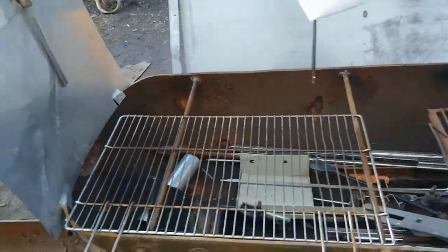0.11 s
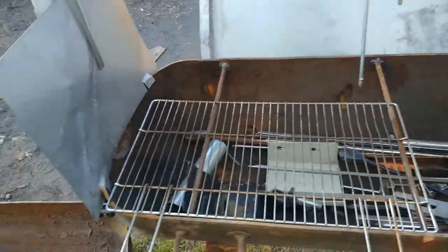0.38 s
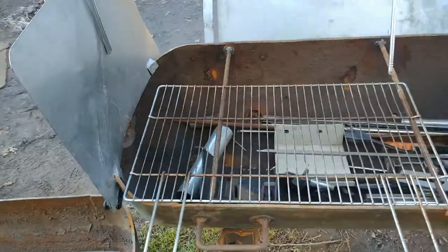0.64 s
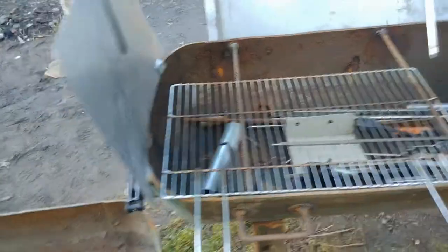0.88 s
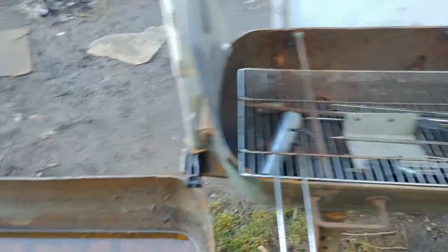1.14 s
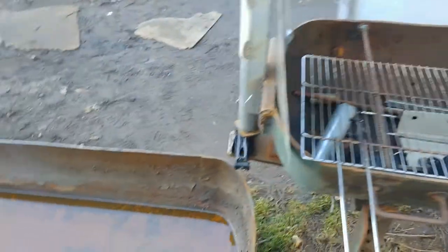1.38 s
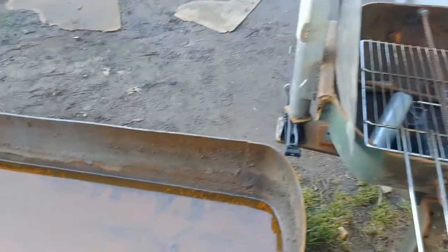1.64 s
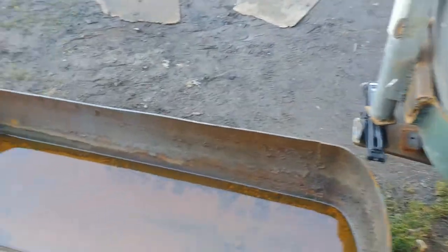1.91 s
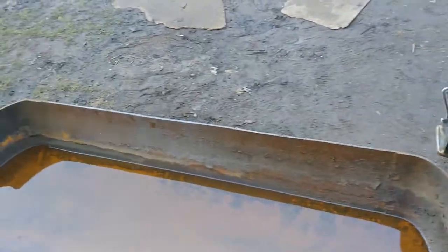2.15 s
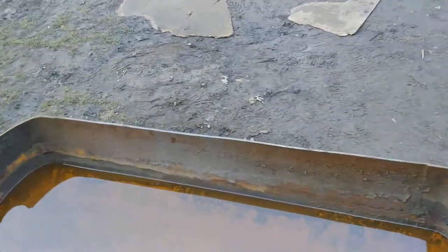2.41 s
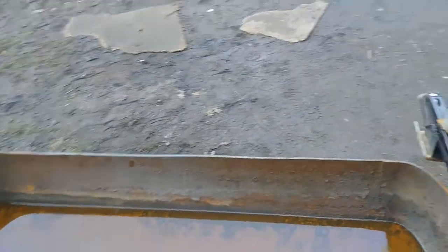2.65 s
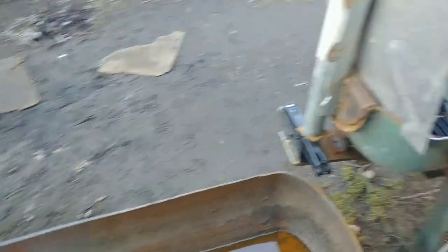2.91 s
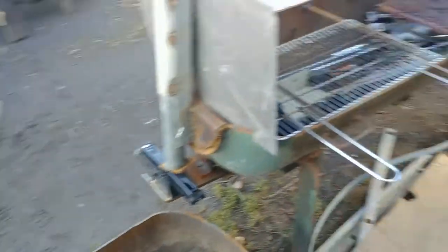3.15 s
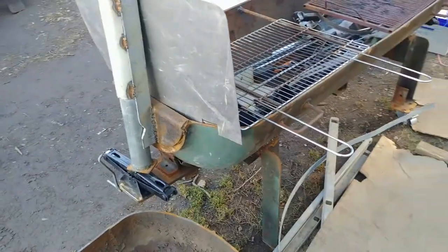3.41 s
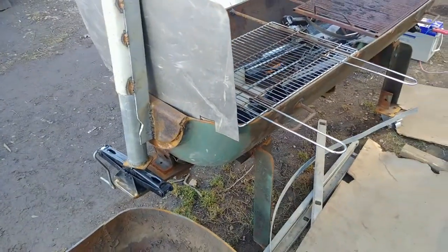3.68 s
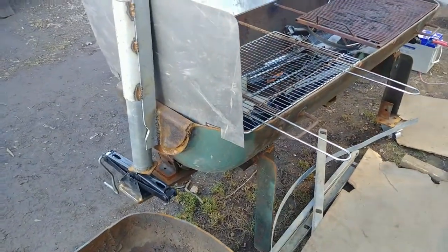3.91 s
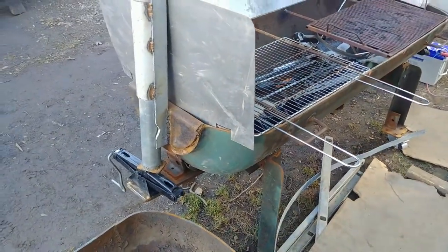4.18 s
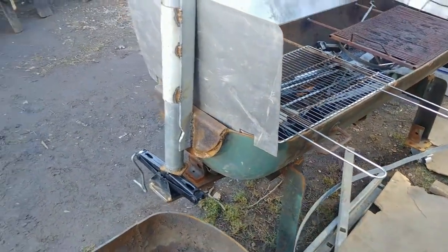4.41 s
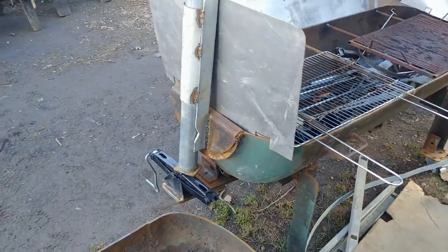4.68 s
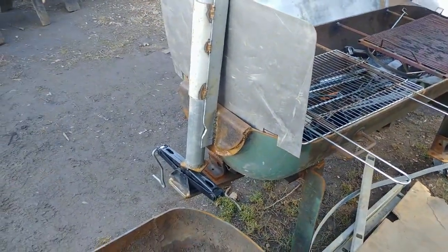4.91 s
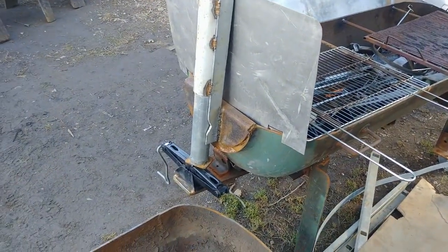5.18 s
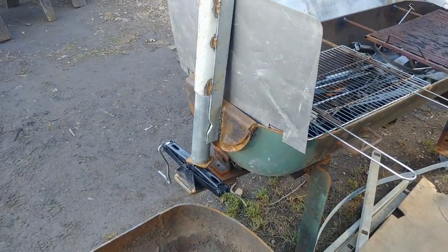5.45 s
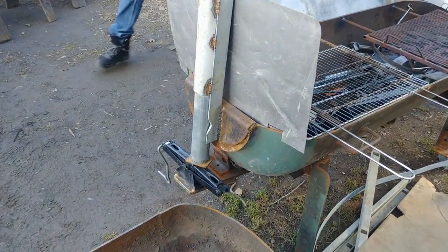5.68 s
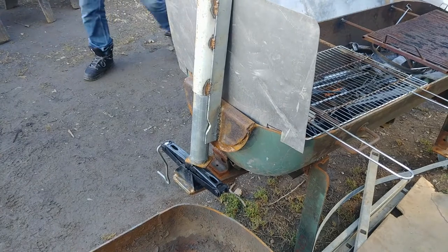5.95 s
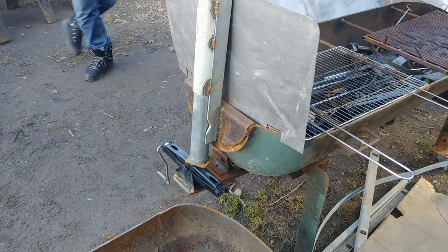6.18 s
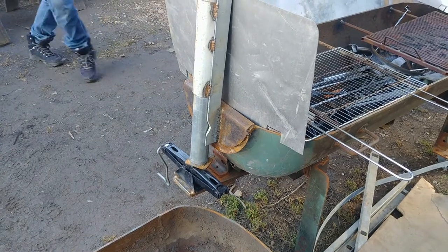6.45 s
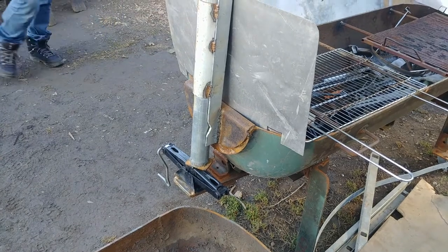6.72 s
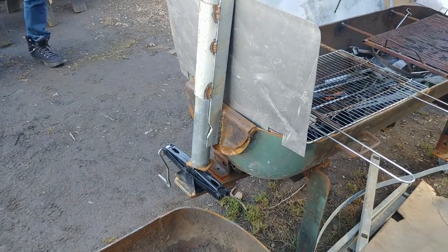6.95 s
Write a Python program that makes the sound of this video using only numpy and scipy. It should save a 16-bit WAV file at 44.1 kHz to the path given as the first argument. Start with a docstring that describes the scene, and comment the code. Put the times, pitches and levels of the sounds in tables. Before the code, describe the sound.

Dull booming knocks on a sheet-steel barbecue trough, with grates clinking and gritty rattles, then a quiet yard with distant traffic and wavering low hum.

```python
"""A yard with a steel barbecue: someone moves round it, phone in hand, then only the yard is left.
The trough booms dully from decaying modes; grates and loose hardware clink as noise cracks over ringing rods.
Random grains make the shudder, the scraping grit and short rasps, the last of them a few far boots.
Behind lie far traffic, a passing car, wavering hum, thin insect-like hiss and two gusts, all mostly shaped noise.
The phone has two microphone ports, each with its own colour."""
import sys
import numpy as np
from scipy import signal
from scipy.fft import rfft, irfft, next_fast_len
from scipy.io import wavfile
from scipy.ndimage import uniform_filter1d

SR = 44100
rng = np.random.default_rng(int(sys.argv[2]) if len(sys.argv) > 2 else 0)


def linear_from_db(decibels):
    """Turn decibels (scalar or array-like) into linear amplitude factors; 0 gives 1."""
    return 10 ** (np.asarray(decibels, float) / 20)


def unload_wav(signal):
    """Save mono or channel-first audio to the path in sys.argv[1] as 16-bit WAV at rate SR, clipped to [-1, 1]."""
    wavfile.write(
        sys.argv[1],
        SR,
        np.round(np.clip(np.atleast_2d(signal).T, -1, 1) * 32767).astype(np.int16),
    )


N = 312228
T = np.arange(N) / SR
M = next_fast_len(N)
F = np.fft.rfftfreq(M, 1 / SR) + 1e-9
LEFT_LAG_S = 0.00016
# all table levels are ahead of the ports and the output gain


def unit(x):
    """Scale to rms 1."""
    return x / np.sqrt(np.mean(x ** 2))


def table(rows):
    """Read a (f/Hz, value) table at every frequency, straight on a log axis."""
    hz, value = np.transpose(rows)
    return np.interp(np.log(F), np.log(hz), value)


def colour(x, gain):
    """Filter by a gain for each frequency."""
    return irfft(rfft(x, M) * gain, M)[..., :N]


def band(x, lo_hz, hi_hz, order=2):
    """Causal band-pass."""
    sos = signal.butter(order, [lo_hz, min(hi_hz, .45 * SR)], "band", fs=SR, output="sos")
    return signal.sosfilt(sos, x)


def hump(hz, width):
    """Gain of one steep resonance."""
    return 1 / (1 + ((F - hz) / (width / 2)) ** 2)


def walk(rate):
    """Random levels held 1 / rate s, slewed twice and halved."""
    k = int(SR / rate)
    held = np.repeat(rng.standard_normal(N // k + 1), k)
    return 0.5 * uniform_filter1d(uniform_filter1d(held, k), k)[:N]


def grains(rate, spread_db):
    """Random tiny impacts, rate per second, some stronger than the rest."""
    hit = rng.random(N) < rate / SR
    return hit * rng.standard_normal(N) * linear_from_db(spread_db * np.minimum(rng.exponential(size=N), 3))


def add(out, s, x):
    """Mix x into out from time s on."""
    i = int(s * SR)
    out[i:i + len(x)] += x[:N - i]


def decay(t, t60):
    """Even decay, down 60 dB after t60 s."""
    return np.exp(-np.log(1000) * t / t60)


def ring(hz, db, t60, length):
    """Sum of decaying modes struck at time zero."""
    t = T[:int(length * SR)]
    return linear_from_db(db) @ (decay(t, t60[:, None]) * np.sin(2 * np.pi * hz[:, None] * t))


def swells(s, fade_s, db, rise_share=1):
    """Bell-shaped swells summed in power; rise_share is rise time over fade time."""
    power = np.zeros(N)
    for at, fade, gain in zip(s, fade_s, linear_from_db(db)):
        reach = fade * np.where(T < at, rise_share, 1)
        power += gain ** 2 * np.exp(-2 * ((T - at) / reach) ** 2)
    return np.sqrt(power)


def shudders(s, db, t60, rise_s=0.0039):
    """A quick rise at each jolt, then an even decay; summed in power."""
    power = np.zeros(N)
    for at, gain, fall in zip(s, linear_from_db(db), t60):
        t = np.maximum(T - at, 0)
        power += (gain * np.minimum(t / rise_s, 1) * decay(t, fall)) ** 2
    return np.sqrt(power)


# dull blows on the trough, the last few faint and far:
# [t/s, level/dB, boom f/Hz, boom t60/s, upper modes and clatter relative level/dB]
BLOWS = [(0.093, -11.5, 216.2, 0.24, -27), (0.394, -21.5, 270, 0.093, -24),
         (0.8225, 6.5, 200, 0.054, -29.5), (1.392, -26.5, 430, 0.13, -11.5), (1.453, -30, 460, 0.089, -6),
         (2.101, -15, 102, 0.11, -15), (2.1453, -14, 334, 0.03, -10), (2.1504, 1.5, 238, 0.037, -23.5),
         (3.1224, -14, 257, 0.079, -19), (3.147, -16, 236, 0.047, -20), (3.165, -9, 279, 0.12, -16),
         (3.222, -7, 375, 0.095, -17), (3.244, -13.5, 200, 0.044, -21), (3.308, -24, 350, 0.061, -10.5),
         (3.393, -21.5, 190.1, 0.1, -24), (4.485, -29, 640, 0.086, -17.5), (5.942, -26, 271, 0.086, -26),
         (6.177, -25, 344, 0.1, -39), (6.208, -29, 180, 0.39, -38)]
# upper modes of the trough: [f/Hz, relative level/dB, t60/s]
TROUGH_MODES = [(553, -0.5, 0.081), (836, -3.5, 0.058), (1111, -15, 0.088), (1460, -5.5, 0.024),
                (1885, -12.5, 0.043)]


def knocks(boom_db=-3, partner=1.37, contact_ms=1.37, clatter_db=14, modes_db=8, clatter_t60=0.071, rise_s=0.0011):
    """Each blow booms at its own pitch with a weaker partner mode; the contact is soft."""
    out = np.zeros(N)
    noise = rng.standard_normal(N)
    push = np.hanning(int(contact_ms * SR / 1000) + 3)
    upper_hz, mode_db, upper_t60 = np.transpose(TROUGH_MODES)
    chance = rng.standard_normal((len(BLOWS), 2, len(TROUGH_MODES)))
    for (s, level_db, hz, t60, upper_db), (detune, uneven) in zip(BLOWS, chance):
        boom = ring(hz * np.array([1, partner]), boom_db + np.array([0, -6.0]), t60 * np.array([1, .7]), .3)
        t = T[:len(boom)]
        boom *= 1 - np.exp(-t / rise_s)  # the big sheet takes a moment to swing
        blow = np.convolve(boom, push / push.sum())[:len(boom)]
        # countless upper sheet modes blur into a short clatter
        clatter = decay(t, clatter_t60) * noise[int(s * SR / 2):][:len(boom)]
        clatter = band(band(clatter, 370, 1700, order=3), 280, 1500, order=3)
        body = ring(upper_hz * (1 + 0.035 * detune), mode_db + modes_db + 2.25 * uneven, upper_t60, .3)
        body *= np.minimum(t * 1000 / contact_ms, 1) ** 2
        add(out, s, linear_from_db(level_db) * (blow + linear_from_db(upper_db) * (linear_from_db(clatter_db) * clatter + body)))
    return out


# small hard contacts, near and far: [t/s, level/dB before a common lift, main band f/Hz,
# 8 kHz band level/dB over the main band, 13 kHz band level/dB over the main band]
CONTACTS = [(0.0111, -38, 3700, -4.5, -14), (0.039, -29.5, 2900, -29, -42), (0.0921, -25, 4370, -30, -50),
            (0.513, -47.5, 4370, -12, -21), (0.88, -54.5, 3340, 5, -37), (0.9166, -38.5, 5100, -8.5, -34),
            (1.0431, -25.5, 6420, -26, -30), (1.0447, -33, 6870, -30, -26), (1.8966, -40.5, 4840, -33, -48),
            (1.9208, -35, 3900, -35, -53), (1.933, -32, 4330, -39, -58), (1.94, -31.5, 4650, -43, -55),
            (1.971, -37, 4660, -31, -53), (2.1455, -31, 3230, -15, -34), (2.196, -46.5, 3340, 2, -9),
            (2.211, -48, 3400, 4, -8), (2.321, -43, 3200, -3, -15), (2.3354, -32.5, 6730, -16, -11.5),
            (2.441, -39, 4000, -24, -20), (2.5435, -36, 3210, -2, -7), (2.6703, -50, 3480, -10, -23),
            (2.7558, -25.5, 3920, -4.5, -9), (3.1659, -38, 3540, -7.5, -30), (3.2182, -39, 3860, -5, -25),
            (3.4756, -24, 5640, -15, -19.5), (3.4777, -18, 4220, -13, -35), (3.904, -45.5, 5200, -0.5, -16),
            (5.214, -48, 3900, -7, -29)]
# rods of the grate: [f/Hz, relative level/dB, t60/s]
RODS = [(1810, -2, 0.083), (2038, -12, 0.068), (3700, 7, 0.07), (3820, 12, 0.049), (4190, 8, 0.044),
        (5200, -3.5, 0.069), (7340, 8, 0.025), (7900, 25.5, 0.016), (8470, 5, 0.025)]
# body, 8 kHz and 13 kHz bands of every contact: [low edge f/Hz, high edge f/Hz]
CONTACT_BANDS = [(1100, 2700), (6600, 9400), (10300, 16300)]
NEAR_BODY_DB, FAR_BODY_DB = -24, -0.5  # body band over the main band: far contacts are duller


def clinks(modes_db=-25, scatter_db=9.0, crack_s=0.00065, tail_db=-10, t60=0.19, lift_db=6,
           spread=1.163, far_db=-45, strike=8.5):
    """A crack and a noisy tail, band by band, over the short ring of the rods."""
    out = np.zeros(N)
    hz, db, ring_t60 = np.transpose(RODS)
    chance = rng.standard_normal((len(CONTACTS), 2, len(hz)))
    t = T[:int(.15 * SR)]
    noise = rng.standard_normal((len(CONTACTS), len(t)))
    for (s, level_db, main_hz, high_db, top_db), (uneven, detune), fuzz in zip(CONTACTS, chance, noise):
        main_band = (main_hz / spread, main_hz * spread)
        bands = np.insert(np.array(CONTACT_BANDS, float), 1, main_band, axis=0)
        far = 1 / (1 + linear_from_db(level_db - far_db))  # 0 near, 1 far
        body_db = NEAR_BODY_DB + far * (FAR_BODY_DB - NEAR_BODY_DB)
        weight_db = level_db + lift_db + np.array([body_db, 0, high_db, top_db])
        rods_db = np.interp(hz, np.sort(bands.mean(axis=1)), weight_db) + db + modes_db + scatter_db * uneven
        # no two rods are tuned alike, and each takes a moment to start
        hit = ring(hz * (1 + 0.017 * detune), rods_db, ring_t60, .15) * (1 - np.exp(-t / 0.00043))
        # faint contacts are further off: the crack is lost and the tail swells in softly
        crack = (1 - far) * np.exp(-t / crack_s)
        tail = linear_from_db(tail_db * (1.5 - far)) * (1 - np.exp(-t / (0.0034 + 0.0046 * far)))
        fuzz = np.append(strike, fuzz[1:])  # the first touch is one firm pulse
        for (lo, hi), w in zip(bands, weight_db):
            # the treble is mostly crack: its tail is weaker and dies first
            shape = crack + tail * (3000 / lo) ** 0.86 * decay(t, t60 * (3000 / lo) ** 0.48)
            hit += linear_from_db(w) * band(shape * fuzz, lo, hi, order=3) * np.sqrt(SR / 2 / (hi - lo))
        add(out, s, hit)
    return out


# one rod or panel rattles on alone after a contact: [t/s, level/dB, f/Hz, t60/s]
RATTLES = [(0.013, -29, 2160, 0.08), (0.041, -29.5, 2020, 0.15), (0.094, -24, 2800, .03),
           (0.093, -26, 3700, 0.17), (3.4751, -15.5, 1630, .025), (3.898, -38, 3525, .08),
           (6.168, -50, 1755, .2), (6.173, -44, 3510, 0.12)]


def buzzes(spread=1.05):
    """A single resonance kept uneven by loose contact while it dies away."""
    out = np.zeros(N)
    t = T[:int(.15 * SR)]
    noises = rng.standard_normal((len(RATTLES), len(t)))
    for (s, db, hz, t60), noise in zip(RATTLES, noises):
        uneven = .5 * unit(band(noise, hz / spread, hz * spread, order=1))
        add(out, s, linear_from_db(db) * decay(t, t60) * (np.sin(2 * np.pi * hz * t) + uneven))
    return out


def near(x, echo_db=-4, echo_t60=0.024, echo_hz=1700):
    """Left hears lower tones a little later; ground and sheet metal send each port other short echoes."""
    t = T[:int(.15 * SR)]
    echo = rng.standard_normal((2, len(t))) * decay(t, echo_t60) * (t > .002)
    echo = signal.sosfilt(signal.butter(4, echo_hz, "high", fs=SR, output="sos"), echo)
    echo *= linear_from_db(echo_db) / np.sqrt(np.sum(echo ** 2, axis=1)[:, None])
    late = colour(x, np.exp(-2j * np.pi * F * LEFT_LAG_S / (1 + (F / 1600) ** 2)))
    return np.array([late, x]) + signal.fftconvolve(x[None], echo, axes=1)[:, :N]


# the trough shudders on after a jolt: [t/s, rumble level/dB, t60/s, clatter level/dB over the rumble]
JOLTS = [(0, -22.5, 0.43, -8), (0.078, -27, 0.86, -11), (.31, -39, 0.55, -3), (0.833, -19.5, 0.49, -18.5),
         (1.059, -34, 0.43, -9), (1.33, -35, 1, -14), (1.389, -30.5, 0.61, -7), (1.451, -23, 0.33, -32),
         (2.099, -16, 0.75, -22.5), (2.16, -17.5, 0.6, -16), (2.292, -33, 0.77, -26), (3.137, -17, 1, -18),
         (3.228, -9.5, 0.17, -29), (3.31, -25.5, 0.42, -20), (3.395, -26, 0.14, -26),
         (3.479, -36.5, 0.059, 9), (3.609, -25.5, 0.43, -9.5), (3.695, -31.5, 0.56, -15)]
# gritty scrapes: [loudest t/s, fade t/s, grit level/dB, clatter level/dB over grit, top level/dB over grit]
GRITTY_SCRAPES = [(0.027, 0.038, -39.5, -8, -22), (0.098, 0.034, -42.5, 10.5, -40),
                  (0.199, 0.26, -59.5, 11.5, -25), (0.884, 0.031, -46.5, -7, -35),
                  (.925, 0.058, -51, 6.5, -33), (1.054, 0.036, -44, 1, -17), (1.461, 0.056, -51, 12, -25),
                  (1.901, 0.029, -48.5, -31, -37), (1.94, 0.032, -49.5, -29, -42),
                  (1.999, 0.036, -43, -39, -41), (2.112, 0.022, -45, -1, -20),
                  (2.176, 0.082, -45, 6.5, -15), (2.298, 0.025, -45, 6, -27),
                  (2.35, 0.06, -45.5, -24, -26.5), (2.46, 0.032, -57, -1, -27),
                  (2.549, 0.039, -50.5, 8.5, -12), (2.67, 0.14, -63.5, 11.5, -25),
                  (3.154, 0.048, -41, 4, -18), (3.247, 0.084, -43.5, -12, -15), (3.34, 0.24, -51, -6, -17),
                  (3.448, 0.051, -42.5, 4, -15.5), (3.497, 0.052, -34.5, 5.5, -14),
                  (3.57, 0.11, -34, 1, -18.5), (3.623, 0.069, -32, 7, -15), (3.69, 0.048, -47, -1, -15),
                  (4.4, 0.042, -62.5, 17, -30), (4.63, 0.026, -53.5, -2, -30), (5.22, 0.025, -58, 15, -30),
                  (6.191, 0.049, -65, 22, -36)]
# colours of the rumble, the clatter and the grit: [f/Hz, relative level/dB per Hz]
RUMBLE_COLOUR = [(35, -38), (60, -5.5), (187, 0), (340, -4.5), (458, -14.5), (600, -14.5), (780, -16.5),
                 (1320, -120)]
CLATTER_COLOUR = [(300, -1), (480, 2), (1000, 0), (2100, -6.5), (2600, -19.5), (4000, -57)]
GRIT_COLOUR = [(1500, -23), (2300, -13), (2700, -1), (3550, 4.5), (4400, 0.5), (5360, -3), (7720, -4),
               (9000, -15.5), (10500, -39), (13000, -45)]


def shake(own=0.9):
    """Dense small jolts rumble and clatter in the trough while grit scratches over metal."""
    jolt_s, rumble_db, jolt_t60, shaken_db = np.transpose(JOLTS)
    s, fade_s, grit_db, scraped_db, top_db = np.transpose(GRITTY_SCRAPES)

    def scrape(db):
        """Loudness of all scrapes, rising faster than they fade."""
        return swells(s, fade_s, db, rise_share=0.49)

    rumble_gain = shudders(jolt_s, rumble_db, jolt_t60)
    shaken_gain = shudders(jolt_s, rumble_db + shaken_db, jolt_t60)
    clatter_gain = np.hypot(shaken_gain, scrape(grit_db + scraped_db))
    gains = rumble_gain, clatter_gain, scrape(grit_db), scrape(grit_db + top_db)

    jolts = grains(2000, 0.94) * linear_from_db(2.0 * walk(29.9))
    # grit is spread wide, so each port also hears grains of its own
    own_grit = np.array([grains(8000, 2.5) for _ in range(2)])
    grit = (grains(5000, 2.5) + own * own_grit) * linear_from_db(3.5 * walk(60))
    left_late = np.exp(-2j * np.pi * F * LEFT_LAG_S * np.array([[1], [0]]))
    rumble = colour(jolts, linear_from_db(table(RUMBLE_COLOUR)) * left_late)
    clatter = colour(2.54 * jolts + grit, linear_from_db(table(CLATTER_COLOUR)))
    scratch = colour(grit, linear_from_db(table(GRIT_COLOUR)))
    top = band(band(grit, 12600, 16400, order=1), 11000, 15100, order=4)
    layers = rumble, clatter, scratch, top
    return sum(g * x / np.std(x.mean(axis=0)) for g, x in zip(gains, layers))


# short rasps in one broad resonance, the last four from far boots:
# [loudest t/s, fade t/s, level/dB, f/Hz, 2 kHz body relative level/dB]
SHORT_RASPS = [(1.484, 0.028, -50, 3470, -26), (1.991, 0.062, -52, 5070, -28), (2.351, 0.042, -47, 3480, 2),
               (2.453, 0.084, -46.5, 3500, 2), (4.41, 0.015, -60.5, 3850, 8),
               (4.625, 0.032, -55.5, 5100, 1.5), (5.22, 0.012, -60, 3920, -8), (6.18, 0.027, -79, 3100, 3)]


def rasps(skirt_db=-3, spread=1.174):
    """Grains in a quick swell through a main resonance, a broad skirt and a lower body; partly own to each port."""
    grit = grains(5600, 2.5) + 1.1 * np.array([grains(6600, 1.3) for _ in range(2)])
    grit = grit / np.std(grit.mean(axis=0))
    out = np.zeros((2, N))
    for s, fade_s, db, hz, body_db in SHORT_RASPS:
        span = slice(max(int((s - .1) * SR), 0), int((s + .15) * SR))
        burst = grit[:, span] * swells([s], [fade_s], [db], rise_share=0.16)[span]
        bands = (hz / spread, hz * spread, 0), (1500, 2500, body_db), (2400, 6800, skirt_db)
        for lo, hi, gain_db in bands:
            out[:, span] += linear_from_db(gain_db) * band(burst, lo, hi) * np.sqrt(SR / 2 / (hi - lo))
    return out


def diffuse(gain, alike_hz=560):
    """Coloured noise, alike at both ports in the bass and unrelated in the treble; mid at rms 1."""
    alike = .92 / (1 + (F / alike_hz) ** 3)
    side_gain = np.sqrt((1 - alike) / (1 + alike))
    mid, side = colour(rng.standard_normal((2, N)), gain * np.array([1 + 0 * F, side_gain]))
    late = colour(mid + side, np.exp(-2j * np.pi * F * LEFT_LAG_S))
    return np.array([late, mid - side]) / np.sqrt(np.mean(mid ** 2))


# level of the far traffic rumble before its waver: [t/s, level/dB]
TRAFFIC_LEVEL = [(0, -26), (.35, -36.5), (.8, -37), (1.22, -37.5), (1.4, -37.5), (1.85, -43), (2.7, -35),
                 (3.0, -38.5), (4.0, -36.5), (4.55, -42.5), (4.75, -39.5), (5.1, -43.5), (5.37, -38.5),
                 (5.55, -41), (6.05, -39.5), (6.5, -41), (7.08, -44.5)]
# colour of the open air: [f/Hz, relative level/dB per Hz]
AIR_COLOUR = [(30, -19.5), (65, -2), (110, -7.5), (248, -14), (330, -11), (467, -19.5), (928, -24.5),
              (2670, -39), (4650, -40.5), (6720, -46), (10500, -63), (15200, -52), (16500, -67.5)]


def traffic():
    """Far rumble, broad outdoor noise that follows it 6 dB lower, and a steady faint treble."""
    level_db = np.interp(T, *np.transpose(TRAFFIC_LEVEL))
    air = linear_from_db(table(AIR_COLOUR))
    low, top = 1 / (1 + (F / 110) ** 4), 1 / (1 + (2400 / F) ** 4)
    rumble = linear_from_db(level_db + 0.76 * walk(4.9)) * diffuse(air * low)
    broad = linear_from_db(level_db - 6 + 0.6 * walk(3.5)) * diffuse(air * (1 - low) * (1 - top))
    return rumble + broad + linear_from_db(-66.5) * diffuse(air * top)


# a far car rolls by: (loudest t/s, fade t/s, level/dB, f/Hz, width f/Hz)
CAR = (6, 2, -53.5, 788, 898)


def tyres():
    """One broad resonance of noise swells and fades as the car passes."""
    at, fade_s, db, hz, width = CAR
    return swells([at], [fade_s], [db]) * linear_from_db(1.3 * walk(2.4)) * diffuse(hump(hz, width))


# hum tones: [f/Hz, width f/Hz, level/dB over its spells]; the last is steady, its level absolute
HUM_TONES = [(308, 9.2, -0.5), (376, 2, -3.5), (552, 11, -62.5)]
# spells of the lower, then of the upper hum tone: [start t/s, length t/s, level/dB]
SPELLS = [
    [(-.2, 0.77, -44.5), (.5, 3.2, -52), (4.65, 0.79, -51.5), (5.6, 1.8, -56.5)],
    [(.2, 3.8, -67.5), (4.65, 2.9, -49)],
]


def hum(fade_s=0.12):
    """Tones waver in pitch and level, each on a narrow bed of noise."""
    gains = []
    for spells in SPELLS:
        gains.append(sum(linear_from_db(db) * np.clip(np.minimum(T - s, s + length - T) / fade_s, 0, 1)
                         for s, length, db in spells))
    out = np.zeros((2, N))
    for (hz, width, db), gain in zip(HUM_TONES, gains + [1]):
        cycles = hz * T + width / 2 * np.cumsum(walk(9)) / SR
        tone = np.sqrt(2) * np.sin(2 * np.pi * cycles)
        out += gain * linear_from_db(db) * (tone * linear_from_db(1.6 * walk(7.2)) + 0.58 * diffuse(hump(hz, width)))
    return out


# swells of the 5 kHz hiss: [loudest t/s, fade t/s, level/dB before a common trim]
HISS_SWELLS = [(0, 0.14, -46), (.8, 0.16, -64.5), (1.22, 0.2, -58.5), (1.85, 0.16, -64), (3.9, 0.17, -57)]
# thin hiss bands without swells: [f/Hz, width f/Hz, level/dB]
THIN_BANDS = [(5200, 110, -77), (6655, 110, -79.5)]


def hiss(rest_db=-74.5, trim_db=-4.5):
    """Insect-like narrow noise: one band swells over a resting level, thinner ones only flutter."""
    swell = linear_from_db(rest_db) + swells(*np.transpose(HISS_SWELLS))
    out = swell * linear_from_db(trim_db + 2.0 * walk(35)) * diffuse(hump(4790, 730))
    for hz, width, db in THIN_BANDS:
        out += linear_from_db(db + 2.0 * walk(26)) * diffuse(hump(hz, width))
    return out


# wind, mostly on the right port: [t/s, level/dB, f/Hz, bell length t/s]
GUSTS = [(1.66, -23, 105, 0.031), (2, -23.5, 112, 0.011)]


def puffs():
    """Brief low gusts: bell-shaped bursts of bass noise, weak on the left port."""
    noise = rng.standard_normal(N)
    gust = np.zeros(N)
    for s, db, hz, length in GUSTS:
        gust += linear_from_db(db) * np.exp(-.5 * ((T - s) / length) ** 2) * unit(band(noise, hz / 2, hz * 1.03))
    return gust * np.array([[.2], [1]])


def scene():
    """Near metal, then the yard and wind."""
    metal = near(knocks() + clinks() + buzzes()) + shake() + rasps()
    yard = traffic() + tyres() + hum() + hiss()
    return metal + yard + puffs()


def roll_off(x):
    """The treble ends steeply here."""
    return signal.sosfilt(signal.butter(12, 16840, fs=SR, output="sos"), x)


# colour between the ports: [f/Hz, left minus right level/dB]
PORT_TILT = [(60, 2), (110, 1.5), (200, 2), (380, 0), (700, 1.5), (1290, -3), (2380, 0.5), (4400, -7),
             (8120, 8.5), (15000, -4)]


def record(dry):
    """Each port tilts the sound its own way, the deep bass is cut and the loudest boom is rounded."""
    tilt = linear_from_db(table(PORT_TILT) / 2)
    late = np.exp(-1j * 1.41 / (1 + (1170 / F) ** 4))  # left phase falls 1.41 rad behind above 1170 Hz
    x = colour(dry, np.array([tilt * late, 1 / tilt]))
    x = signal.sosfilt(signal.butter(5, 56.0, "high", fs=SR, output="sos"), x)
    mix = np.tanh(x * 0.77) / 0.85
    return roll_off(mix)


dry = scene()
out = record(dry)
unload_wav(out)
```